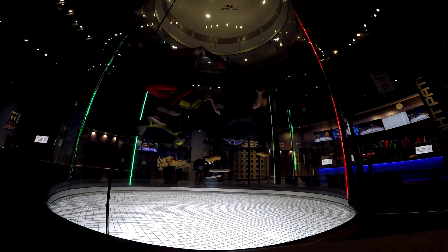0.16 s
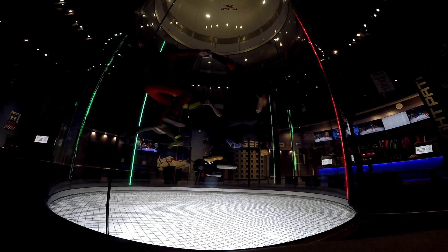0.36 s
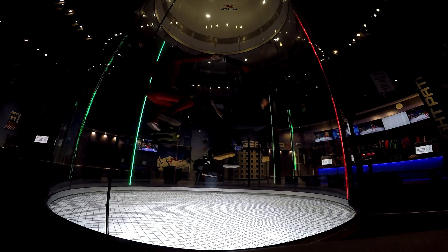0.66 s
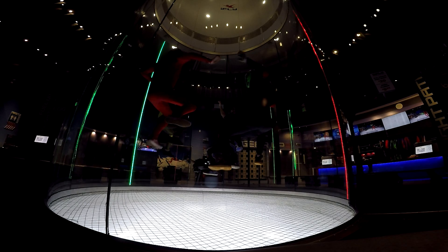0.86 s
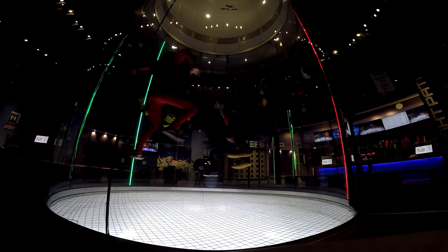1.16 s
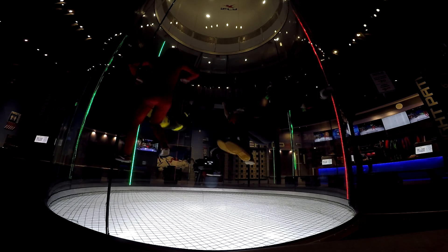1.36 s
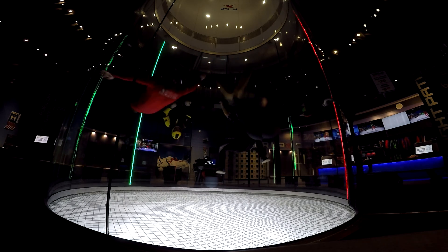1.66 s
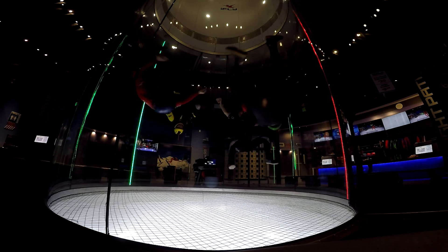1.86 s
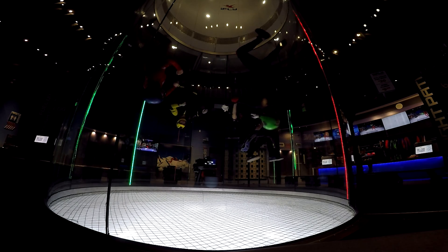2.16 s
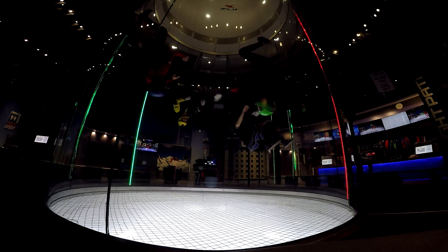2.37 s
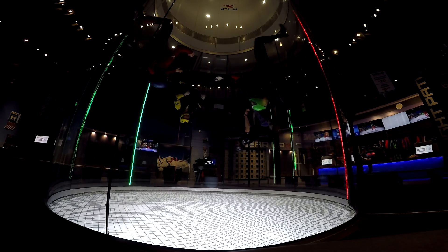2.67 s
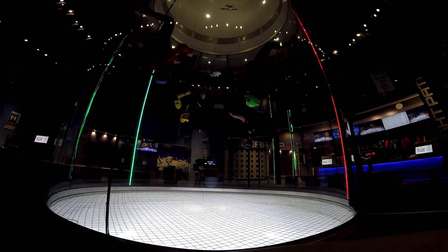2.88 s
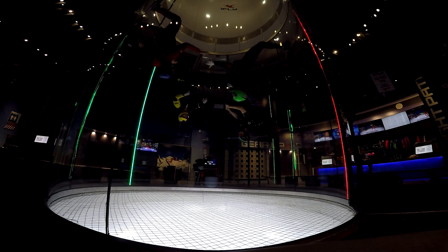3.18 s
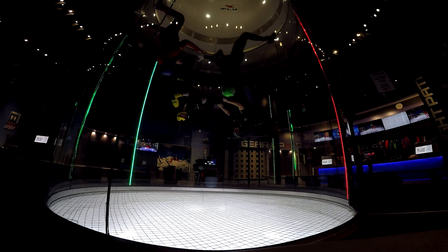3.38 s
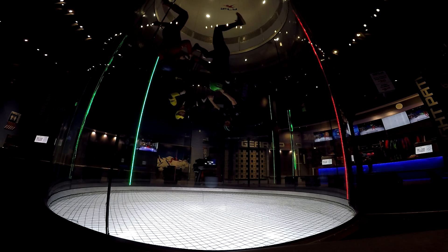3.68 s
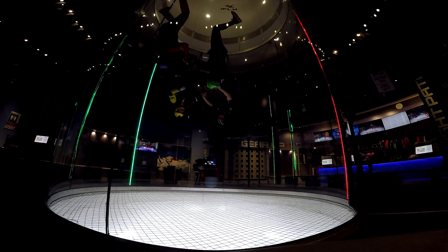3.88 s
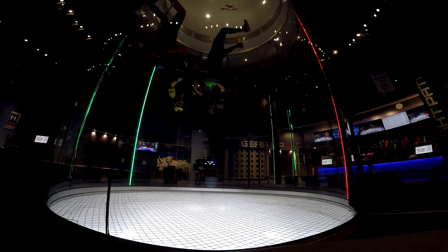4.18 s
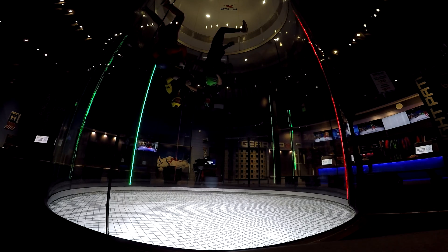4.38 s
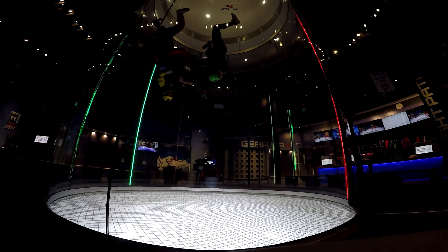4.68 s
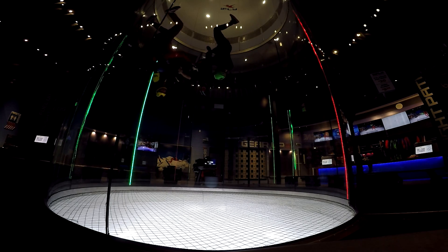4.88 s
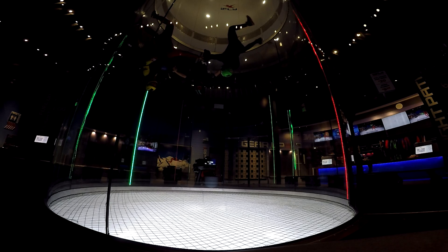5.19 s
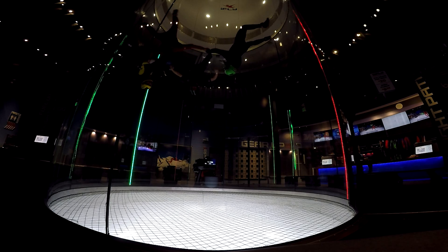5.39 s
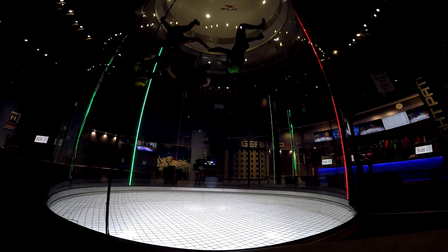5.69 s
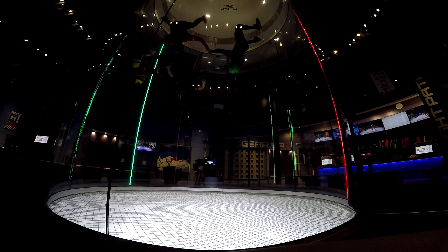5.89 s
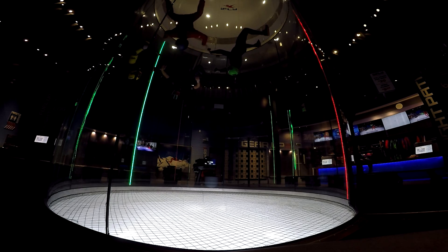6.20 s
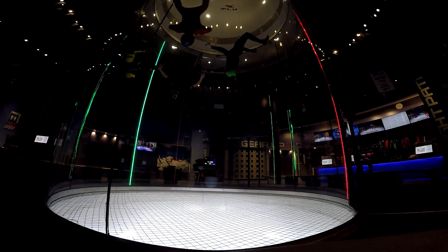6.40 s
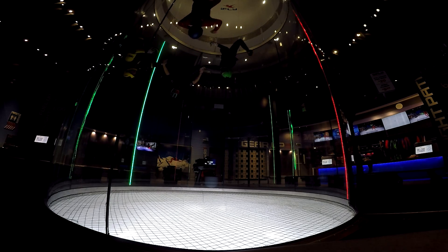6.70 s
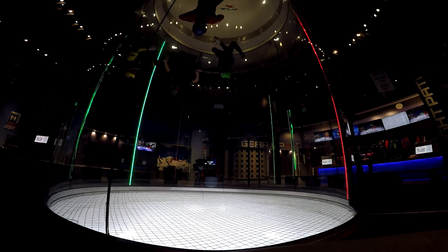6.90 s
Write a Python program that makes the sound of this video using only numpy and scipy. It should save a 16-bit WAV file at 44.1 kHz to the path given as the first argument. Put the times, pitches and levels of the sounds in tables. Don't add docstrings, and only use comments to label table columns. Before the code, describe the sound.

Constant powerful airflow roars through an indoor flying chamber, bass swelling and dipping, thin whine and hiss on top, occasional short pressure knocks.

```python
import sys
import numpy as np
from scipy import signal
from scipy.fft import irfft, next_fast_len
from scipy.io import wavfile
from scipy.ndimage import uniform_filter1d

SR = 44100
rng = np.random.default_rng(int(sys.argv[2]) if len(sys.argv) > 2 else 0)


def unload_audio(sound):
    columns = np.transpose(np.atleast_2d(sound))
    steps = np.round(np.clip(columns, -1, 1) * 32767)
    wavfile.write(sys.argv[1], SR, steps.astype(np.int16))


def decibels_to_gain(level_db):
    exponent = np.asarray(level_db, float) / 20
    return 10 ** exponent


N = 310895


def unit(x):
    return x / np.sqrt(np.mean(x ** 2))


def walk(rate_hz):
    hold = int(SR / rate_hz)
    steps = np.repeat(rng.standard_normal(N // hold + 1), hold)
    slewed = uniform_filter1d(uniform_filter1d(steps, hold), hold)
    return unit(slewed[:N])


def bumps(rows, rise_s, fall_s):
    t = np.arange(0, N / SR, .002)
    total = 0
    for peak_s, height in rows:
        width_s = np.where(t < peak_s, rise_s, fall_s)
        total = total + height * np.exp(-((t - peak_s) / width_s) ** 2)
    return np.interp(np.arange(N) / SR, t, total)


def swells(rows, rise_s, fall_s):
    powers = [(peak_s, decibels_to_gain(2 * level_db)) for peak_s, level_db in rows]
    return np.sqrt(bumps(powers, rise_s / np.sqrt(2), fall_s / np.sqrt(2)))


def evened(x, seconds, share):
    k = int(seconds * SR)
    power = uniform_filter1d(uniform_filter1d(x ** 2, k), k)
    return x * (np.mean(x ** 2) / power) ** share


# mode_hz, width_hz, gain_db
DUCT_MODES = [(34.2, 13, 2.5), (42, 2.2, -3), (52, 13, 1.5), (61.7, 2.7, -1), (85, 7.1, 3),
              (109.4, 11, 5.5), (140, 9, 4.5), (157, 16, -3.5), (180, 14, 5), (227, 11, -1.5),
              (241, 27, 2.5), (302.7, 15, -4.5), (316.6, 27, 4), (350, 8.1, -3.5), (400, 14, 0.5),
              (494.7, 8.7, 4), (656, 11, 0.5), (663, 44, 2.5), (738, 28, 1.5), (824, 17, 1.5),
              (1140, 30, 2), (1320, 20, -3), (2114, 140, -11), (2206, 46, 5.5), (3450, 390, -5.5),
              (743, 11, -1), (1030, 40, -2), (1460, 110, 3), (7700, 300, -3), (8400, 700, 3.5)]


def turbulence(spectrum, flicker_db, rate_hz):
    size = next_fast_len(N)
    hz = np.maximum(np.arange(size // 2 + 1), 1) * SR / size
    point_hz, point_db = np.transpose(spectrum)
    db = np.interp(np.log(hz), np.log(point_hz), point_db, left=-150, right=-150)
    for mode_hz, width_hz, gain_db in DUCT_MODES:
        db = db + gain_db / (1 + (2 * (hz - mode_hz) / width_hz) ** 2)
    noise = decibels_to_gain(db) * np.exp(2j * np.pi * rng.random(len(hz)))

    half_octave = 2 * np.log2(hz)
    first, last = 2 * np.log2(point_hz[0]), 2 * np.log2(point_hz[-1])
    out = np.zeros(N)
    for centre in np.arange(np.floor(first), last + 1):
        band = np.cos(np.pi / 2 * np.clip(half_octave - centre, -1, 1)) ** 2
        out = out + irfft(noise * band, size)[:N] * decibels_to_gain(flicker_db * walk(rate_hz))
    return unit(out)


# time_s, flow_db
FLOW = [
    (0.0, -0.5),
    (1.8, 0.15),
    (2.6, .3),
    (4.5, .3),
    (5.6, 1.4),
    (6.2, 0),
    (7.05, 0.2),
]
# freq_hz, density_db
RUMBLE = [(6, -32), (18.5, -20.5), (26, -1.5), (59, 0.5), (97, -0.5), (160, -14.5), (210, -46), (350, -120)]
ROAR = [(94, -38), (160, -5.5), (284, -5.5), (322, -4), (375, -5.5), (484, -2), (564, -6), (657, -1.5),
        (746, -1), (848, -4.5), (1160, -23), (1430, -26.5), (2070, -35.5), (2320, -34.5), (3350, -53.5),
        (4360, -83), (7370, -120)]
HISS = [(1970, -50.5), (3350, -23.5), (4690, -2.5), (4900, 2), (5190, -4.5), (5580, -15.5), (6200, -22.5),
        (8060, -52.5), (13600, -120)]
AIR = [(5800, -27), (6300, 2), (6910, -5.5), (7300, 1), (9000, -10.5), (9390, -16.5), (10120, -10.5),
       (10960, -16), (11760, -12.5), (12500, -18), (13400, -19)]
# peak_s, rumble_db
LULLS = [
    (1.0, -1.5),
    (2.15, -3),
    (3.24, -2),
    (3.87, -2),
    (4.36, -4.5),
    (4.75, -3),
    (5.06, -4),
    (5.32, -5.5),
    (6.18, -4.5),
]


def airflow():
    time_s, level_db = np.transpose(FLOW)
    flow_db = np.interp(np.arange(N) / SR, time_s, level_db)
    lull_db = bumps(LULLS, rise_s=0.054, fall_s=0.054)
    steady = evened(turbulence(RUMBLE, flicker_db=-1.2, rate_hz=3.9), seconds=0.039, share=0.14)
    rumble = decibels_to_gain(-29.9 + lull_db) * steady
    roar_db = -31 + 0.22 * flow_db + 0.27 * lull_db
    roar = decibels_to_gain(roar_db) * turbulence(ROAR, flicker_db=0.1, rate_hz=6.6)
    hiss = decibels_to_gain(-56.5 + flow_db) * turbulence(HISS, flicker_db=0.5, rate_hz=13.0)
    air = decibels_to_gain(-83 + 0.7 * flow_db) * turbulence(AIR, flicker_db=-0.3, rate_hz=9.0)
    return rumble + roar + hiss + air


# pitch_hz, level_db (pitch alone is played)
NET_TONE = [(1389, -62)]
# peak_s, level_db
LOCKS = [(0.01, -56.5), (0.13, -54.5), (0.33, -54), (0.79, -56.5), (1.07, -63), (1.52, -56), (1.95, -60.5),
         (2.34, -61.5), (2.5, -60), (2.94, -60), (3.22, -62), (3.42, -55), (3.53, -52), (3.73, -53),
         (4.37, -62), (4.48, -56.5), (4.72, -55.5), (4.82, -59), (5.36, -59), (5.68, -56), (5.91, -60),
         (6.28, -58.5), (6.51, -55), (6.77, -56), (6.96, -55), (7.04, -57.5)]


def net_whistle():
    rest_db = -64.5
    size = np.hypot(decibels_to_gain(rest_db), swells(LOCKS, rise_s=.08, fall_s=.035))
    pitch_hz = NET_TONE[0][0] + 2.8 * walk(14.0)
    phase = 2 * np.pi * np.cumsum(pitch_hz) / SR
    return np.sqrt(2) * size * decibels_to_gain(2.1 * walk(19.0)) * np.sin(phase)


# peak_s, level_db
BOOMS = [
    (0.08, -35.5),
    (1.55, -31.5),
    (2.8, -35.5),
    (3.75, -35.5),
    (5.17, -34.5),
    (5.74, -33),
    (6.06, -32.5),
    (6.47, -34),
    (6.95, -30),
]


def duct_boom():
    pitch_hz = 49.4 + 1.2 * walk(3.0)
    phase = 2 * np.pi * np.cumsum(pitch_hz) / SR
    return np.sqrt(2) * swells(BOOMS, rise_s=.13, fall_s=.13) * np.sin(phase)


# peak_s, size_db, length_ms
SLAPS = [
    (2.7047, -15.7, 1.25),
    (5.5101, -14.6, 1.3),
    (5.8339, -15.5, 1.2),
    (7.0315, -15.9, 1.3),
]


def slapped(air):
    air = air.copy()
    for peak_s, size_db, length_ms in SLAPS:
        near = np.arange(int((peak_s - .006) * SR), int((peak_s + .006) * SR))
        u = (near / SR - peak_s) * 1000 / length_ms
        pulse = np.cos(np.pi * u) * np.exp(-(u / .6) ** 2)
        flow_left = 1 - np.exp(-(u / .9) ** 2)
        air[near] = air[near] * flow_left - decibels_to_gain(size_db) * pulse
    return air


def scene():
    return slapped(airflow() + net_whistle() + duct_boom())[None, :]


def roll_off(x):
    return signal.sosfilt(signal.butter(12, 13460, fs=SR, output="sos"), x)


def record(dry):
    even = evened(dry, seconds=0.048, share=0.13) * decibels_to_gain(-0.18)
    ceiling_db, knee = -16.5, 24
    rounded = even / (1 + np.abs(even / decibels_to_gain(ceiling_db)) ** knee) ** (1 / knee)
    fade = np.clip((N - np.arange(N)) / SR / .002, 0, 1)
    return roll_off(rounded * fade)


dry = scene()
out = record(dry)
unload_audio(out)
```